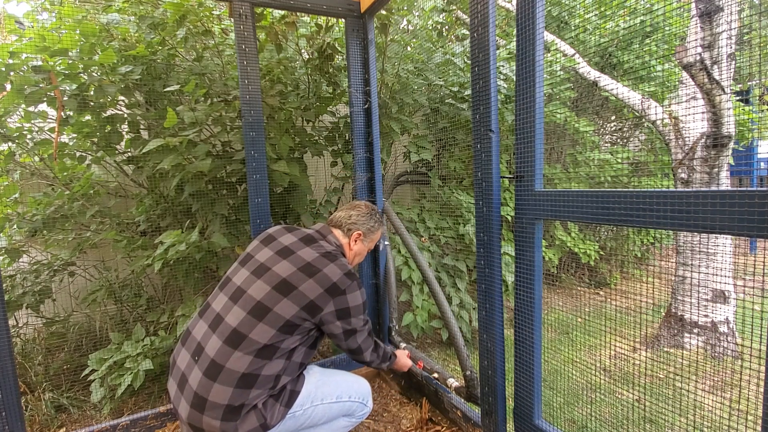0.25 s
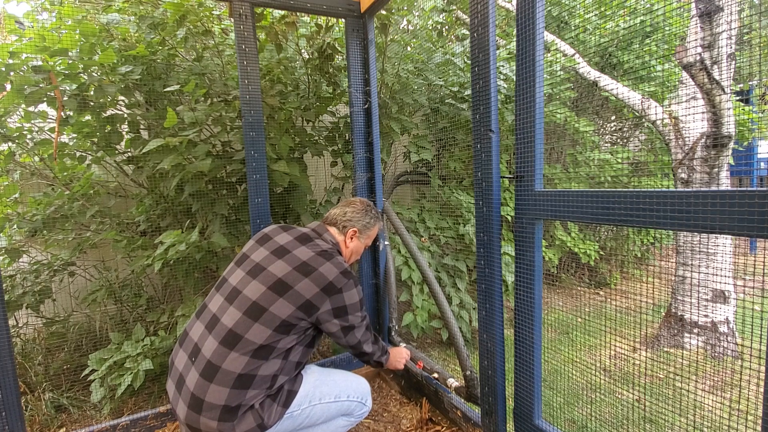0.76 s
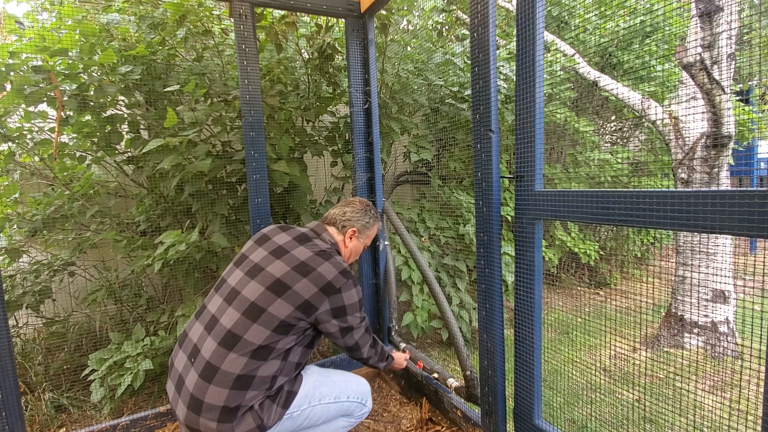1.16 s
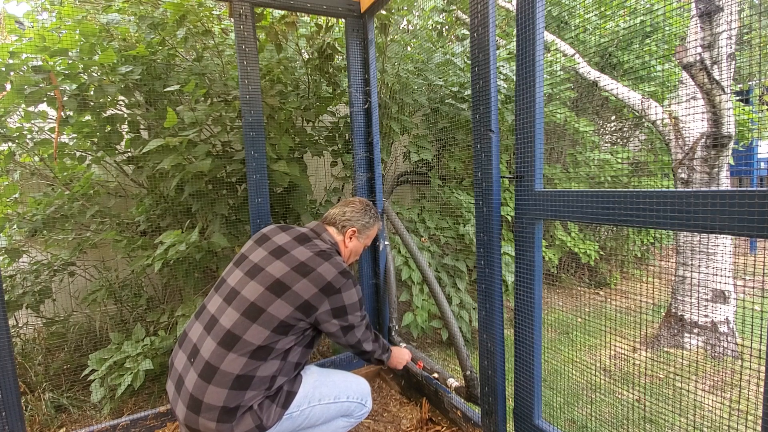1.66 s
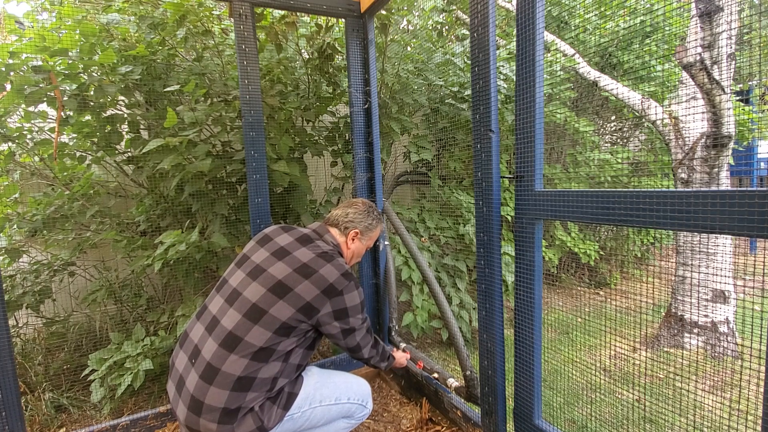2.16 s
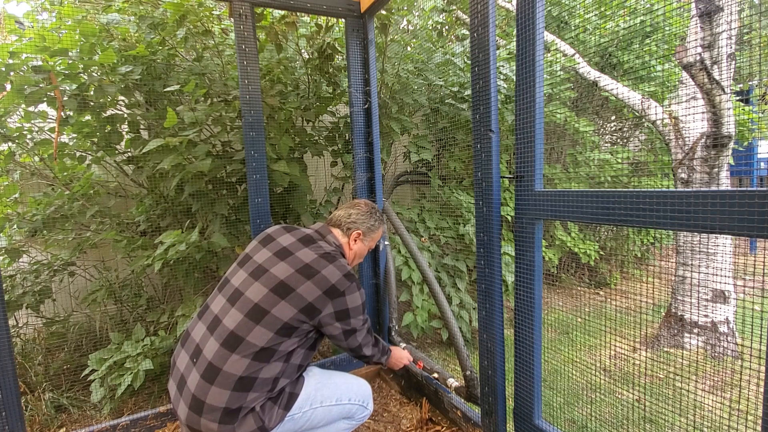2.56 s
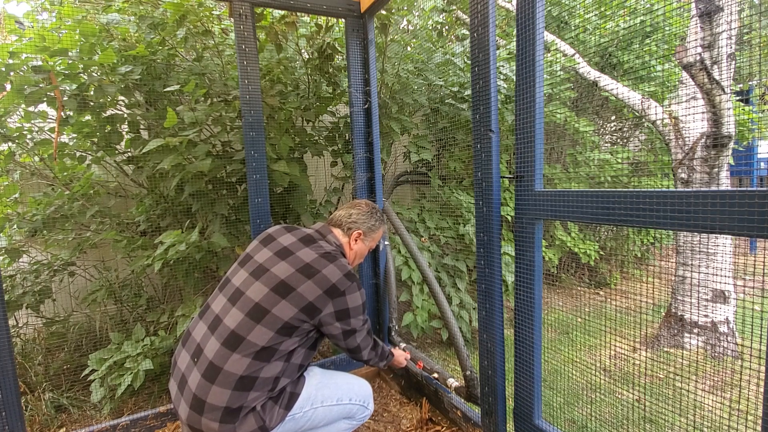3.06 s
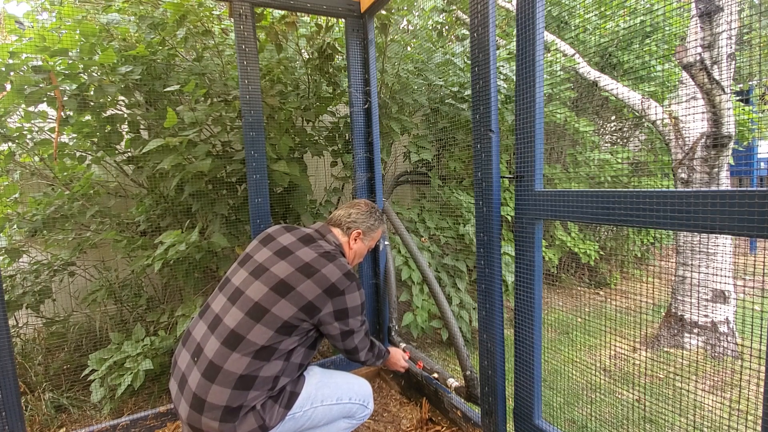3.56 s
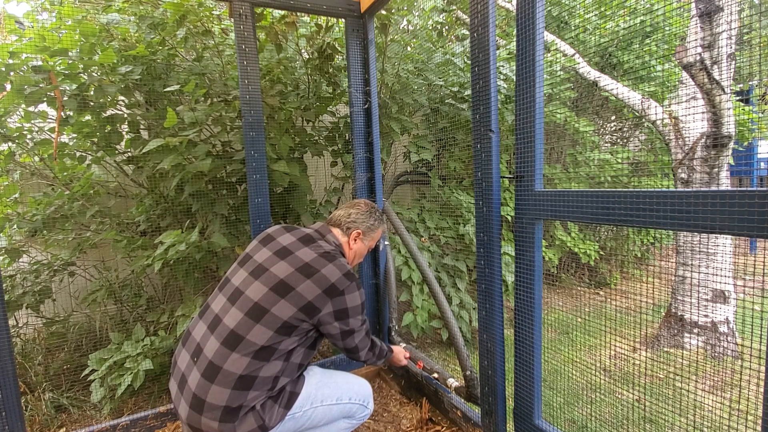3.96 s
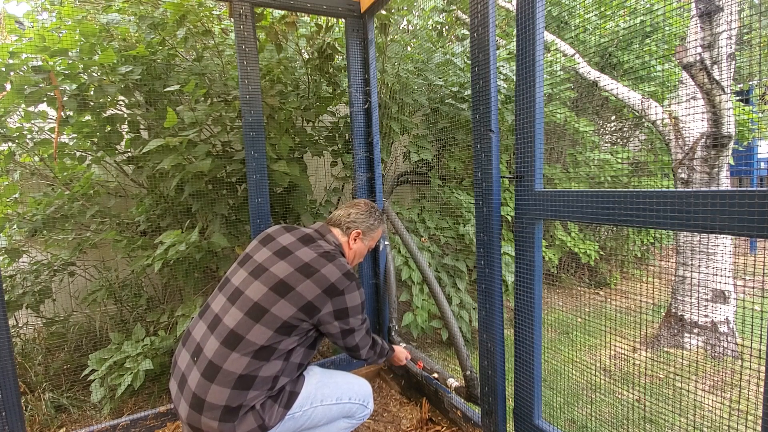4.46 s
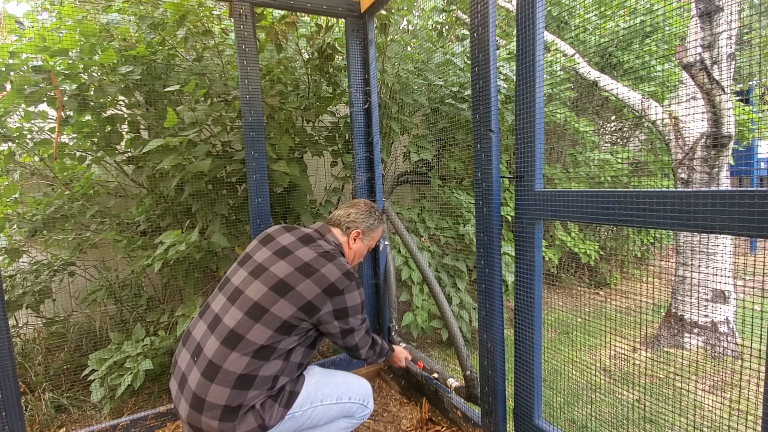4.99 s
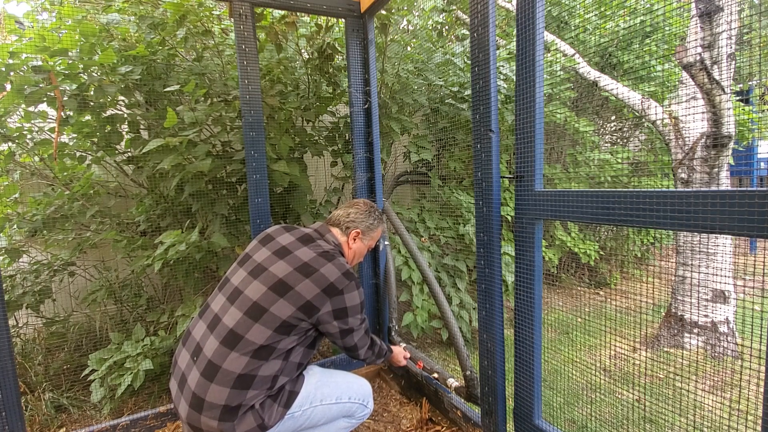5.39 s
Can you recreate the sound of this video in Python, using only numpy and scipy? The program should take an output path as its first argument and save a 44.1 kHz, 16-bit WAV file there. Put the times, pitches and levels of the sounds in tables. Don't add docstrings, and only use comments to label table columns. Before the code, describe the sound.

In a garden hen run, leaves crackle under someone's hands, hens murmur and cluck, and one hen finishes with a loud, drawn-out squawk.

```python
import sys
import numpy as np
from scipy import signal
from scipy.io import wavfile
from scipy.ndimage import uniform_filter1d

SR = 44100
rng = np.random.default_rng(int(sys.argv[2]) if len(sys.argv) > 2 else 0)


def to_wav(sig):
    pcm = np.clip(np.atleast_2d(sig), -1, 1) * 32767
    pcm = np.round(pcm).astype(np.int16)
    wavfile.write(sys.argv[1], SR, pcm.T)


def magnitude_from_level(level_db):
    exponent = np.asarray(level_db, float) / 20
    return 10 ** exponent


N = 248283

# t/s, level/dB
ROAD_DB = [(0, -1.5), (1.6, .6), (2.4, -2.5), (3.1, 1.5), (4.1, -.6), (5.0, 1.5), (5.63, -1.5)]
# start t/s, swell/s, level/dB, 20 dB fall/s
BUMPS = [
    (.14, .03, -54, .15),
    (1.01, .025, -51, .1),
    (2.9, .03, -49, .08),
]
# f/Hz, density/dB per Hz
RUMBLE = [(21, -39), (35, -8.5), (84, 1.5), (110, -7.5), (135, -15.5), (209, -19.5), (260, -21),
          (340, -49.5), (570, -120)]
# f/Hz, density/dB per Hz
HUM = [(120, -20), (200, -8), (283, -2.5), (334, -4.5), (473, -4), (590, -5.5), (749, -2.5), (1000, 5.5),
       (1910, -31), (7410, -38), (9580, -33), (16000, -30.5)]
# start t/s, swell/s, dull level/dB, bright level/dB, 20 dB fall/s
RUSTLE = [(.1, .07, -86, -76, .17), (.386, .012, -68, -82, .2), (.47, .1, -92, -79, .3),
          (.636, .045, -66, -64, .05), (.845, .02, -62.5, -67, .14), (.97, .05, -88, -75, .25),
          (1.262, .008, -69, -68, .1), (1.39, .025, -92, -81, .4), (1.6, .08, -86, -85, .2),
          (1.9, .1, -75, -70, .12), (2.428, .005, -85, -80, .3), (2.54, .046, -86, -67, .14),
          (2.796, .012, -84, -69, .16), (2.947, .065, -69, -65, .08), (3.285, .02, -84, -70, .22),
          (3.77, .01, -92, -83, .15), (3.85, .04, -90, -76, .3), (3.95, .08, -88, -73, .1),
          (4.15, .03, -92, -83, .15), (4.385, .03, -82, -70, .15), (4.755, .08, -86, -70.5, .18),
          (4.93, .07, -90, -74, .25), (5.25, .02, -82, -60, .09), (5.305, .03, -75, -64, .13)]
# t/s, peak level/dB, dull part/dB, bright part/dB
SNAPS = [(0.557, -69, -12, -14), (0.848, -58, -31, -7), (1.0237, -65, -36, -5.5), (1.264, -52, -21, -12.5),
         (1.994, -62, -17, -13), (2.4259, -60.5, -19, -12), (2.794, -64, -23, -9), (3.0066, -51, -20, -15),
         (3.7688, -62, -36, -10), (5.257, -45, -43, -9.5), (5.3275, -48, -30, -8)]
# f/Hz, density/dB per Hz
DULL = [(1470, -58), (2500, -59), (2720, 0), (3880, 9), (4730, -3.5), (7000, -9), (9100, -37),
        (15400, -120)]
# f/Hz, density/dB per Hz
BRIGHT = [(2650, -44), (4500, -6), (8070, -4.5), (10100, 2), (11700, -20.5), (14500, 6), (16000, -10)]
# start t/s, swell/s, level/dB, 20 dB fall/s
SCRAPES = [
    (.385, .015, -68, .2),
    (.553, .016, -73, .06),
    (.64, .036, -69.5, .08),
    (.875, .025, -71, .15),
]
# f/Hz, density/dB per Hz
BODY = [(350, -46), (600, -6.5), (802, -6), (899, -13), (1060, -9), (3000, -11), (3900, -48), (6600, -120)]
# t/s, level/dB
THUD = [(2.5, -72), (2.63, -58.5), (2.7, -72)]
# start t/s, length/s, strongest partial level/dB, upper rasp level/dB
CAWS = [
    (0.926, 0.11, -61.5, -70),
    (1.201, 0.12, -60, -68.5),
    (1.529, .13, -58.5, -69.5),
    (1.877, .13, -60, -70.5),
]
# share of length/1, f/Hz, level/dB
CAW_ARCH = [(0, 1290, -15), (.3, 1410, -1), (.6, 1375, -1), (.85, 1300, -4), (1, 1260, -9)]
# start t/s, length/s, f/Hz, level/dB, 2nd partial over 1st/dB
MURMUR = [
    (2.592, .03, 385, -70, 6),
    (2.715, .035, 388, -72, 10),
    (2.745, .045, 422, -63, -1.5),
    (3.33, .085, 395, -57.5, 2.5),
    (4.28, .035, 402, -55, -1.5),
    (4.37, .17, 390, -70, 10),
    (4.9, .07, 412, -68, 11),
]
# start t/s, length/s, first f/Hz, last f/Hz, level/dB
CLUCKS = [(2.84, .09, 268, 295, -67), (2.935, .05, 225, 240, -65), (3.0, .085, 248, 295, -58),
          (3.09, .07, 295, 320, -66), (3.18, .09, 230, 295, -60.5), (3.32, .03, 325, 330, -57),
          (3.535, .06, 255, 270, -55.5), (3.725, .045, 248, 250, -54), (3.965, .06, 222, 213, -55),
          (4.085, .05, 330, 290, -61), (4.155, .03, 225, 225, -62), (4.19, .05, 235, 255, -62)]
# f/Hz, level/dB
CLUCK_THROAT = [(220, -11), (430, -9), (510, 0), (660, 1.5), (800, -1.5), (1000, -4)]
# start t/s, length/s, first f/Hz, last f/Hz, level/dB
CHEST = [(4.275, .04, 425, 418, -54), (4.318, .025, 430, 444, -57), (4.348, .03, 455, 460, -56),
         (4.395, .025, 474, 465, -54), (4.425, .045, 455, 455, -56), (4.472, .071, 455, 498, -47.5),
         (4.548, .082, 490, 445, -54), (4.635, .04, 455, 462, -51), (4.677, .047, 475, 497, -47),
         (4.738, .05, 515, 530, -43), (4.803, .048, 525, 505, -43), (4.853, .023, 530, 535, -46),
         (4.9, .087, 545, 520, -45), (4.987, .056, 488, 482, -42.5), (5.045, .03, 520, 535, -43),
         (5.094, .032, 538, 525, -41.5), (5.127, .016, 530, 540, -45), (5.163, .028, 545, 535, -44.5),
         (5.192, .026, 540, 540, -42.5), (5.397, .042, 545, 535, -40), (5.455, .033, 600, 590, -43),
         (5.462, .022, 525, 520, -49)]
# t/s, 2nd partial over 1st/dB
CHEST_BEAK = [(4.4, -11), (4.8, -7), (4.87, 0), (5.02, -1.5), (5.045, -9), (5.065, 5), (5.2, 8.5),
              (5.41, 11), (5.47, 5)]
# start t/s,
# length/s, first f/Hz, last f/Hz, level/dB
HEAD = [(4.54, .025, 680, 675, -53), (4.72, .025, 660, 662, -47), (4.782, .022, 678, 675, -49),
        (4.875, .04, 678, 688, -46), (4.96, .04, 690, 660, -51), (5.01, .035, 590, 575, -46),
        (5.068, .03, 715, 650, -52), (5.138, .028, 665, 672, -46), (5.213, .102, 692, 680, -45),
        (5.308, .087, 692, 670, -45.5), (5.44, .02, 680, 640, -39), (5.482, .03, 715, 730, -45)]
# t/s, 2nd partial over 1st/dB
HEAD_BEAK = [(4.5, -35), (4.89, -22), (5.05, -28), (5.2, -14), (5.31, 1.5), (5.39, -8), (5.5, -10)]
# f/Hz, level/dB
OVERTONES = [(700, -8), (1100, -9), (1300, -24), (1440, -20), (1600, -25), (2100, -58), (2400, -45),
             (2700, -43), (3100, -48), (3500, -44), (4200, -70)]
# t/s, level/dB
MOAN_BREATH = [(2.65, -85), (2.8, -70.5), (3.05, -64), (3.3, -64.5), (3.45, -69.5)]
# t/s, level/dB
SQUAWK_BREATH = [(5.385, -72.5), (5.481, -58.5), (5.54, -89)]
# f/Hz, correlation/1
LIKENESS = [(60, 1), (180, 0.9), (550, 0.88), (1650, -0.54), (4970, -0.21), (15000, 0.05)]
# delay t/s, left level/dB, right level/dB
ECHOES = [
    (.0031, -16.5, -8.5),
    (.0083, -8.5, -32.5),
    (.017, -10, -11.5),
]

RUMBLE_DB, HUM_DB, RUMBLE_FOLLOWS = -54.7, -62.3, .4
LEAD_S = .00028
LEAVES_DULL_DB, LEAVES_BRIGHT_DB = -95, -95
JUMP_DB, SWELL_DB_PER_S, ONSET_S = -5, 60, .009
SETTLE_DB, SETTLE_S = -16, .45
HOARSE_DB, HOARSE_SMEAR_S, CLUCK_HOARSE = -19, .05, 2.4
CLUCK_SHAPE = .015, .015, -12, 1.5
GULP_SHAPE = .012, .01, -5.5, 1.2
FLIP_SHAPE = .008, .008, -8, -1.5


def rms_one(x):
    return x / np.sqrt(np.mean(x ** 2) + 1e-20)


def in_time(rows, t):
    s, *columns = np.transpose(rows)
    return [np.interp(t, s, c) for c in columns]


def at_hz(points, hz):
    table_hz, value = np.transpose(points)
    return np.interp(np.log(hz), np.log(table_hz), value)


def drift(rate_hz, size=N):
    r = np.exp(-40 * np.pi * rate_hz / SR)
    white = rng.standard_normal(size // 20 + 2002)
    slow = signal.lfilter([1], [1, -2 * r, r * r], white)[2000:]
    return np.interp(np.arange(size) / 20, np.arange(len(slow)), rms_one(slow))


def late(x, s):
    return np.interp(np.arange(N) - s * SR, np.arange(N), x, left=0)


def bandpass(x, low_hz, high_hz, order):
    return signal.sosfilt(signal.butter(order, [low_hz, high_hz], "band", fs=SR, output="sos"), x)


def banded_noise(spectrum, patchy_db, patch_hz):
    out = 0
    together = drift(patch_hz / 4)
    edges_hz = 22 * 2 ** np.arange(0, 9.6, .5)
    white = rng.standard_normal((2, 2, N))
    for k, (low_hz, high_hz) in enumerate(zip(edges_hz, edges_hz[1:])):
        hz = np.sqrt(low_hz * high_hz)
        if spectrum[0][0] < hz * 1.2 and hz < spectrum[-1][0] * 1.2:
            mid, side = bandpass(white[k % 2], low_hz, high_hz, 2)
            alike = np.clip(at_hz(LIKENESS, hz), 0, 1)
            flicker_db = patchy_db * (0.2 * together + drift(patch_hz))
            stereo = np.sqrt(1 + alike) * mid + np.sqrt(1 - alike) * side * [[1], [-1]]
            out = out + magnitude_from_level(at_hz(spectrum, hz) + flicker_db) * stereo
    return rms_one(out)


def burst(s, swell_s, db, fall_s):
    t = np.arange(N) / SR - s
    rise_db = (JUMP_DB - SWELL_DB_PER_S * swell_s) * np.clip(1 - t / swell_s, 0, 1)
    after = np.maximum(t - swell_s, 0)
    decay = magnitude_from_level(-40 * after / fall_s) + magnitude_from_level(2 * SETTLE_DB - 40 * after / SETTLE_S)
    return np.clip(t / ONSET_S, 0, 1) ** 2 * magnitude_from_level(2 * (db + rise_db)) * decay


def breath(rows, low_hz, high_hz):
    air = bandpass(rng.standard_normal(N), low_hz, high_hz, 4)
    level_db = np.interp(np.arange(N) / SR, *np.transpose(rows), left=-120, right=-120)
    return magnitude_from_level(level_db) * rms_one(air * magnitude_from_level(2 * drift(60)))


def glides(rows, attack_s, release_s, edge_db, swell_db, colour):
    out = []
    for s, length, first_hz, last_hz, db in rows:
        t = np.array([0, min(attack_s, length / 2.5), max(length - release_s, length / 1.7), length])
        hz = first_hz + (last_hz - first_hz) * t / length
        level_db = db + np.array([edge_db, -swell_db, swell_db, edge_db])
        partials_db = [level_db + share_db for share_db in colour(s + t, hz)]
        out.append(np.transpose([s + t, hz, *partials_db]))
    return out


def voice(notes, partials, edge_s, jitter, shimmer_db, wobble_hz, higher=(), lift_db=0):
    out = np.zeros(N)
    for rows in notes:
        start, end = rows[0][0] - edge_s, rows[-1][0] + edge_s
        at = np.arange(round(start * SR), round(end * SR))
        t = at / SR
        hz, *levels_db = in_time(rows, t)
        levels_db += [levels_db[-1] + lift_db + at_hz(OVERTONES, k * hz) for k in higher]
        unsteady_hz = hz * (1 + jitter * drift(wobble_hz, size=len(t)))
        phase = 2 * np.pi * np.cumsum(unsteady_hz) / SR
        to_edge_s = np.minimum(t - start, end - t)
        fade = np.sin(np.pi / 2 * np.clip(to_edge_s / (2 * edge_s), 0, 1)) ** 2
        for k, level_db in zip([*partials, *higher], levels_db):
            flutter_db = shimmer_db * drift(wobble_hz, size=len(t))
            out[at] += np.sqrt(2) * fade * magnitude_from_level(level_db + flutter_db) * np.sin(k * phase + k)
    return out


def placed(x, pan_db, lead_s, wet_db):
    out = np.array([x, late(x, lead_s)]) * magnitude_from_level([[pan_db / 2], [-pan_db / 2]])
    dull = signal.lfilter([.3], [1, -.7], x)
    for s, left_db, right_db in ECHOES:
        out[0] += magnitude_from_level(left_db + wet_db) * late(dull, s)
        out[1] += magnitude_from_level(right_db + wet_db) * late(dull, 1.3 * s)
    return out


def traffic():
    road_db, = in_time(ROAD_DB, np.arange(N) / SR)
    power = magnitude_from_level(2 * (RUMBLE_DB + RUMBLE_FOLLOWS * road_db)) + sum(burst(*row) for row in BUMPS)
    rumble = np.sqrt(power) * banded_noise(RUMBLE, patchy_db=.3, patch_hz=2.3)
    wash = magnitude_from_level(HUM_DB + road_db) * banded_noise(HUM, patchy_db=1.6, patch_hz=2.5)
    left, right = rumble + wash
    return np.array([left, late(right, LEAD_S)])


def rustle():
    t = np.arange(N) / SR
    dull, bright = magnitude_from_level(2 * LEAVES_DULL_DB), magnitude_from_level(2 * LEAVES_BRIGHT_DB)
    for s, swell_s, dull_db, bright_db, fall_s in RUSTLE:
        dull = dull + burst(s, swell_s, dull_db, fall_s)
        bright = bright + burst(s, swell_s, bright_db, fall_s)
    for s, peak_db, dull_db, bright_db in SNAPS:
        power = (t >= s) * magnitude_from_level(2 * (peak_db + 6 - 60 * np.maximum(t - s, 0) / .035))
        dull = dull + power * magnitude_from_level(2 * dull_db)
        bright = bright + power * magnitude_from_level(2 * bright_db)
    grain = magnitude_from_level(1.9 * drift(180))
    dull_noise = magnitude_from_level(4.5) * np.sqrt(dull) * banded_noise(DULL, patchy_db=-3.0, patch_hz=41)
    bright_noise = magnitude_from_level(1.8) * np.sqrt(bright) * banded_noise(BRIGHT, patchy_db=1.5, patch_hz=12)
    return grain * (dull_noise + bright_noise)


def scrapes():
    level = np.sqrt(sum(burst(*row) for row in SCRAPES))
    drag = magnitude_from_level(8) * level * banded_noise(BODY, patchy_db=-3.0, patch_hz=25)
    return drag + breath(THUD, low_hz=120, high_hz=260)


def crow():
    share, arch_hz, swell_db = np.transpose(CAW_ARCH)
    tones, rasps = [], []
    for s, length, tone_db, rasp_db in CAWS:
        t = s + share * length
        tones.append(np.transpose([t, arch_hz, swell_db + tone_db]))
        rasps.append(np.transpose([t, arch_hz, *[swell_db / 2 + rasp_db - 10] * 4]))
    tone = voice(tones, [1], edge_s=.012, jitter=.04, shimmer_db=3, wobble_hz=90)
    rasp = voice(rasps, [1.15, 1.3, 1.44, 1.57], edge_s=.03, jitter=.07, shimmer_db=4, wobble_hz=120)
    pulse_hz = 62 * (1 + .2 * drift(25))
    pulses = 1 + .7 * np.sin(2 * np.pi * np.cumsum(pulse_hz) / SR)
    far_wall = magnitude_from_level(-13) * late(tone * pulses, .1) + magnitude_from_level(-8) * late(rasp, .08)
    return (tone + rasp) * pulses + far_wall


def other_hen():
    coos = []
    for s, length, hz, db, over_db in MURMUR:
        coos += glides([(s, length, hz, hz, db)], *CLUCK_SHAPE, lambda t, hz: [0, over_db])
    return voice(coos, [1, 2], edge_s=.008, jitter=.01, shimmer_db=2, wobble_hz=30, higher=[3])


def near_hen():
    calls = glides(CLUCKS, *CLUCK_SHAPE, lambda t, hz: [at_hz(CLUCK_THROAT, k * hz) for k in (1, 2, 3)])
    gulps = glides(CHEST, *GULP_SHAPE, lambda t, hz: [0, *in_time(CHEST_BEAK, t)])
    flips = glides(HEAD, *FLIP_SHAPE, lambda t, hz: [0, *in_time(HEAD_BEAK, t)])
    clucks = voice(calls, [1, 2, 3], edge_s=.006, jitter=.035, shimmer_db=3.5, wobble_hz=60,
                   higher=[4, 5], lift_db=-4)
    chest = voice(gulps, [1, 2], edge_s=.006, jitter=.013, shimmer_db=1.6, wobble_hz=45,
                  higher=range(3, 8))
    head = voice(flips, [1, 2], edge_s=.004, jitter=.011, shimmer_db=2, wobble_hz=45,
                 higher=range(3, 6), lift_db=17)
    moan_air = breath(MOAN_BREATH, low_hz=300, high_hz=1350)
    squawk_air = breath(SQUAWK_BREATH, low_hz=2450, high_hz=4000)
    power = (chest + head + CLUCK_HOARSE * clucks) ** 2
    effort = np.sqrt(np.abs(uniform_filter1d(power, round(HOARSE_SMEAR_S * SR))))
    hoarse = effort * breath([(0, HOARSE_DB), (N / SR, HOARSE_DB)], low_hz=400, high_hz=1300)
    return chest + head + clucks + moan_air + squawk_air + hoarse


def scene():
    ground = traffic() + rustle() + scrapes()
    far_crow = placed(crow(), pan_db=-10.5, lead_s=.00027, wet_db=10.5)
    other = placed(other_hen(), pan_db=-5, lead_s=-.00023, wet_db=-2.0)
    near = placed(near_hen(), pan_db=-1.1, lead_s=.00013, wet_db=-1.5)
    return ground + far_crow + other + near


def band_limit(x):
    return signal.sosfilt(signal.butter(12, 16500, fs=SR, output="sos"), x)


def record(dry):
    no_bass = signal.sosfilt(signal.butter(2, 42, "high", fs=SR, output="sos"), dry)
    mix = signal.sosfilt(signal.ellip(12, .3, 60, 15800, fs=SR, output="sos"), no_bass)
    return band_limit(mix)


dry = scene()
out = record(dry)
to_wav(out)
```